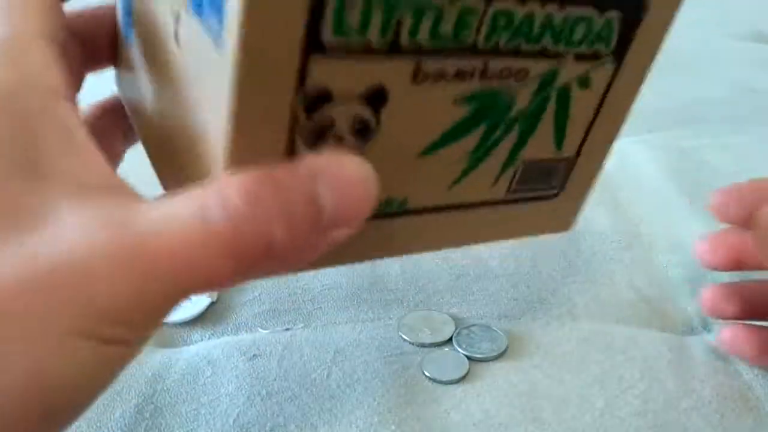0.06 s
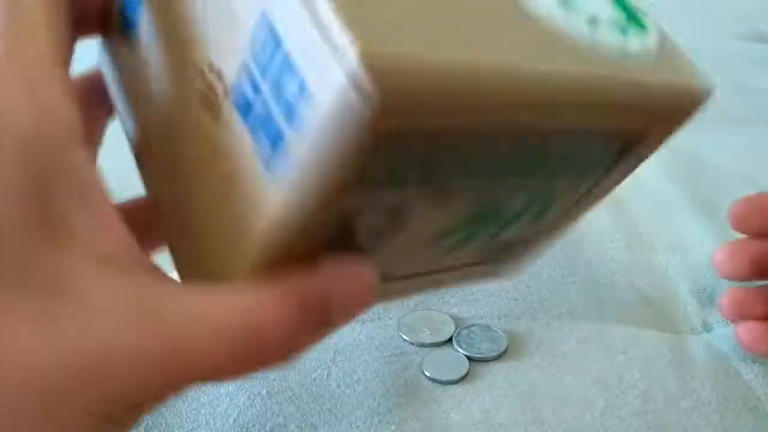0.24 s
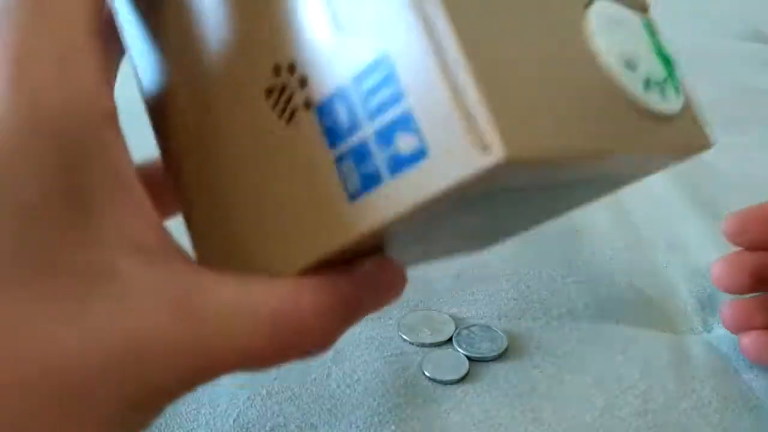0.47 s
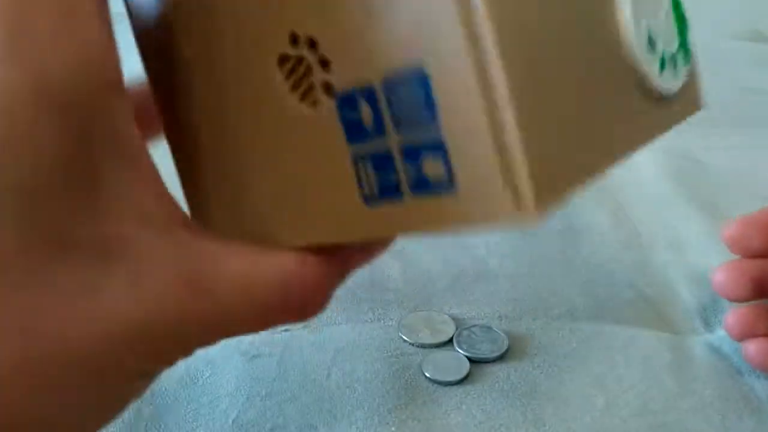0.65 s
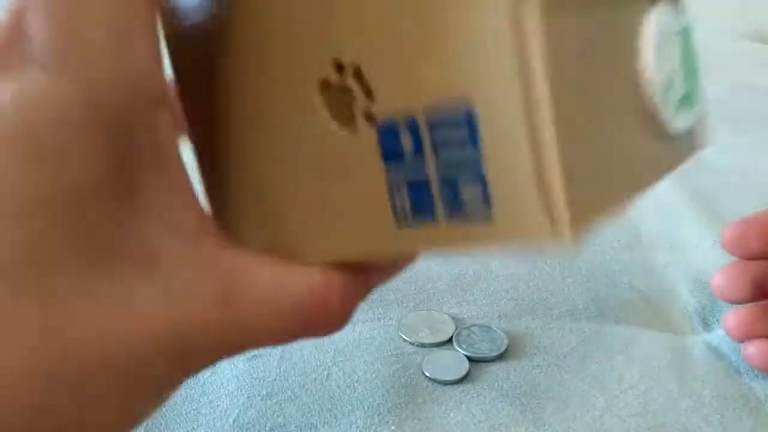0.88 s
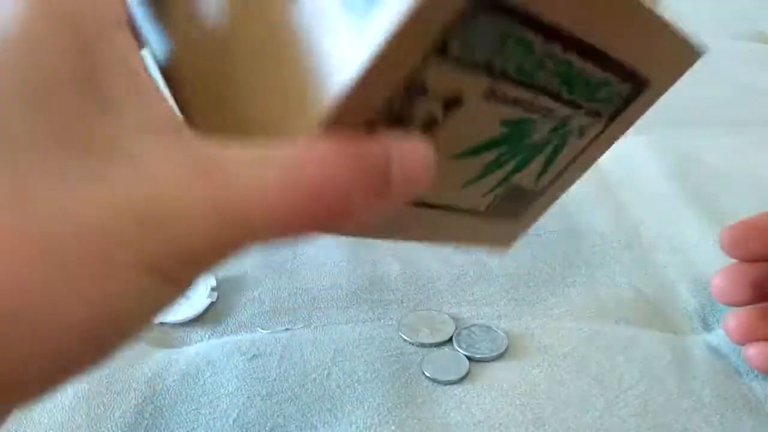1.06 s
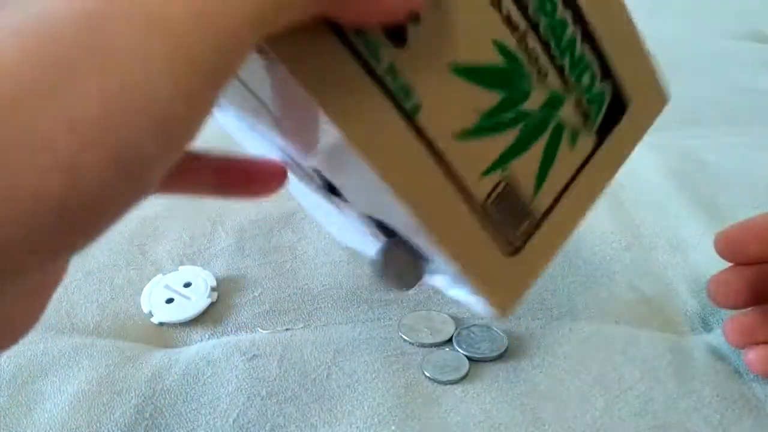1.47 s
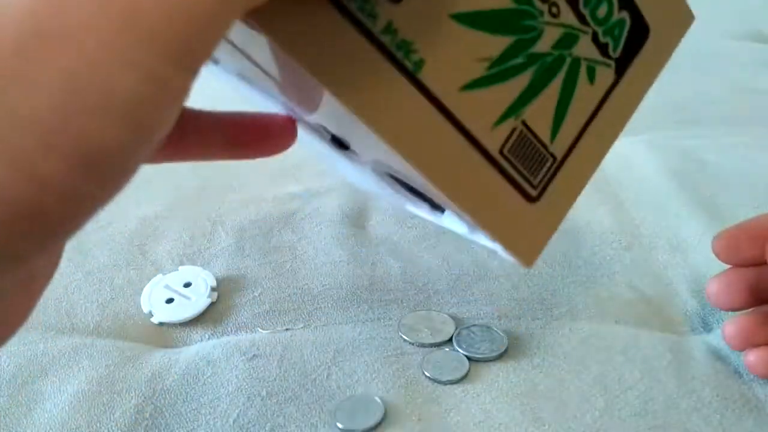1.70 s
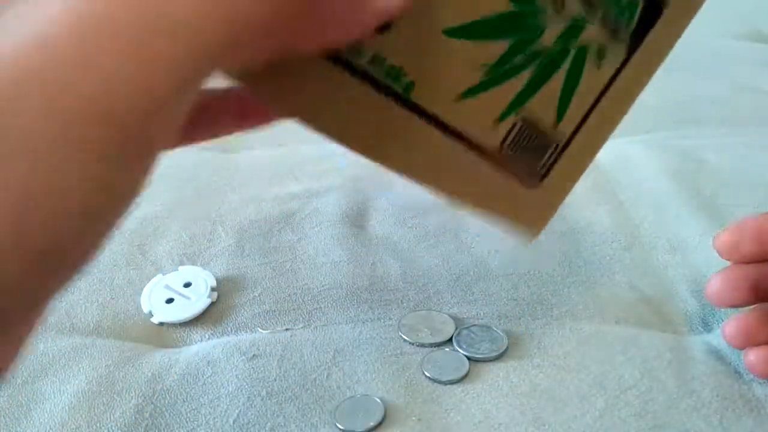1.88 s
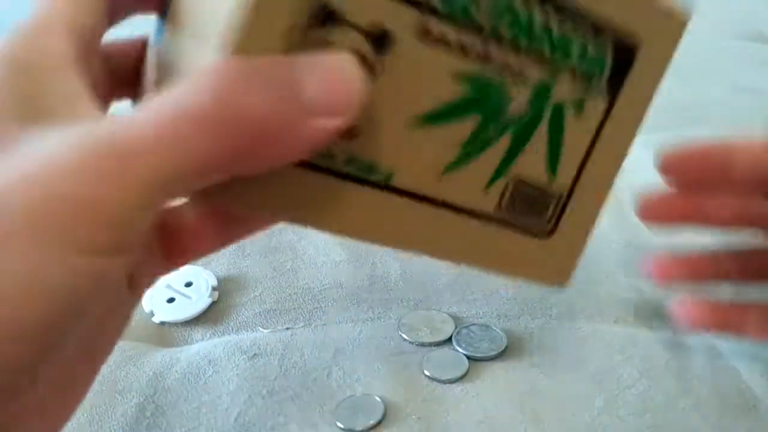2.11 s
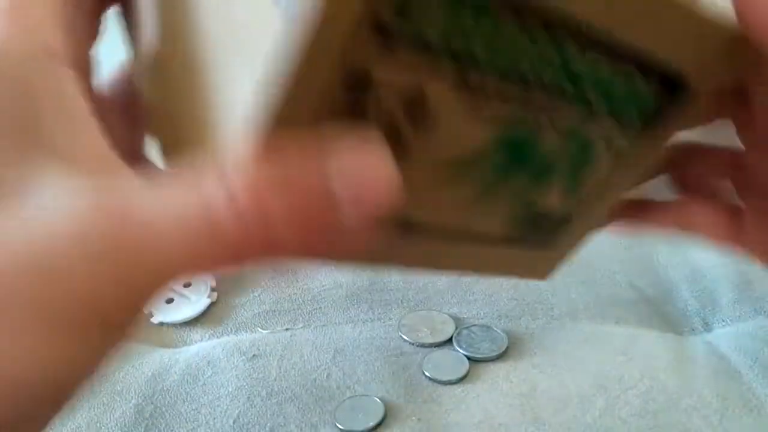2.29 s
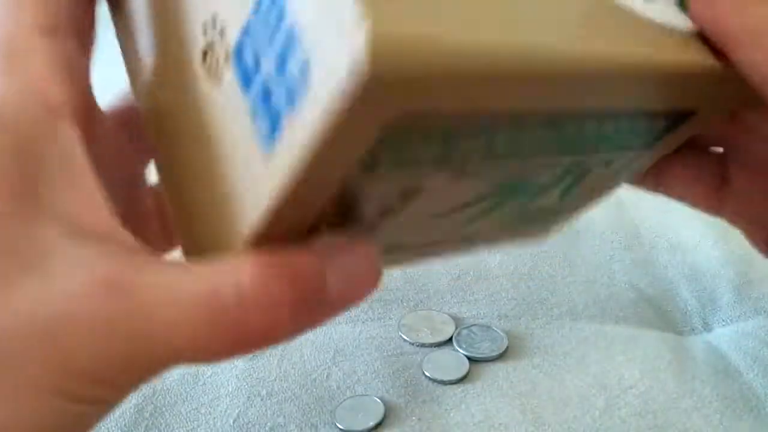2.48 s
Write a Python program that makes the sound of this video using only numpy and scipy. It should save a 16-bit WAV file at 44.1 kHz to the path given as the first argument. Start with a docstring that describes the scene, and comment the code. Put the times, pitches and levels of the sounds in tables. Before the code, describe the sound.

Coins rattle, slide and clink inside a small cardboard box shaken in uneven bursts. One clicks through the slot and thuds softly onto a cushion, then the shaking resumes harder. Close microphone in a small room.

```python
"""Coins in a small cardboard money box, shaken close to the microphone in a small room.
They slide over its floor, knock on its walls, clink on each other and ring while they fly free;
the cardboard panels colour the contacts, and the hollow box booms under the heavy landings.
One coin snaps against the slot and drops on a cushion. The hand rumbles and rubs faintly on the box.
Everything sits in the centre, with a short room tail and a little stereo spread in the treble."""
import sys
import numpy as np
from scipy import signal
from scipy.fft import rfft, irfft, next_fast_len
from scipy.io import wavfile
from scipy.ndimage import uniform_filter1d

SR = 44100
rng = np.random.default_rng(int(sys.argv[2]) if len(sys.argv) > 2 else 0)


def pcm_store(signal):
    """Save signal as 16-bit PCM."""
    levels = np.round(np.clip(np.atleast_2d(signal), -1, 1) * 32767)
    wavfile.write(sys.argv[1], SR, levels.astype(np.int16).T)


N = 116865
T = np.arange(SR // 4) / SR  # time axis of one event, in seconds
ATTACK = 1 - np.exp(-T / .0007)  # the fast onset of a hard contact


def amp(db):
    """Decibels to gain."""
    return 10 ** (np.asarray(db) / 20)


def unit(x):
    """Scale to rms 1."""
    return x / np.sqrt(np.mean(x ** 2) + 1e-20)


def unit_onset(x):
    """Scale to rms 1 over the first 8 ms."""
    return x / np.sqrt(np.mean(x[:SR // 125] ** 2) + 1e-20)


def along(points, hz):
    """Interpolate (freq_hz, value) points on a log frequency axis."""
    freqs, values = np.transpose(points)
    return np.interp(np.log(hz + 1), np.log(freqs + 1), values)


def colour(x, gain):
    """Minimum-phase filter with the given gain over frequency."""
    size = 2 * next_fast_len(len(x) // 2 + 600, real=True)
    cepstrum = irfft(np.log(np.maximum(gain(np.fft.rfftfreq(size, 1 / SR)), 1e-6)))
    cepstrum[1:size // 2] *= 2
    cepstrum[size // 2 + 1:] = 0
    return irfft(rfft(x, size) * np.exp(rfft(cepstrum)))[:len(x)]


def shaped(x, spectrum):
    """Colour by (freq_hz, gain_db) points, at rms 1."""
    return unit(colour(x, lambda hz: amp(along(spectrum, hz))))


def fade(t, t60):
    """Hold at 1 until t = 0, then fall 60 dB every t60 seconds."""
    return amp(-60 * np.maximum(t, 0) / t60)


def gate(length_s, rise_s, release_t60):
    """An envelope that rises, holds until length_s and dies away."""
    return (1 - np.exp(-T / rise_s)) * fade(T - length_s, release_t60)


def add(bus, start_s, x):
    """Mix x into the bus at start_s."""
    part = bus[max(round(start_s * SR), 0):][:len(x)]
    part += x[:len(part)]


def burst(spectrum, t60):
    """A short coloured noise burst."""
    return unit_onset(shaped(rng.standard_normal(len(T)) * fade(T, t60) * ATTACK, spectrum))


def mode(hz, t60):
    """One decaying resonance."""
    return np.sin(2 * np.pi * hz * T) * fade(T, t60)


def scatter(spectrum, t60, count):
    """A few modes at chance pitches within a spectrum."""
    edges = np.linspace(spectrum[1][0], spectrum[-2][0], count + 1)
    pitches = edges[:-1] + np.diff(edges) * rng.random(count)
    modes = sum(rng.choice([-1, 1]) * amp(along(spectrum, hz)) * mode(hz, t60) for hz in pitches)
    return unit_onset(modes * ATTACK)


def flutter(samples):
    """A quick random wavering of rms 1, smoothed over that many samples."""
    return unit(uniform_filter1d(uniform_filter1d(rng.standard_normal(len(T)), samples), samples))


# The quiet background at the microphone: freq_hz, gain_db
BACKGROUND_SPECTRUM = [(30, 5.5), (100, -2.5), (600, -15.5), (3000, -26), (14000, -31)]

def background(level_db=-79):
    """A faint, steady noise, strongest in the bass."""
    return amp(level_db) * shaped(rng.standard_normal(N), BACKGROUND_SPECTRUM)


# Resonances of the cardboard panels: pitch_hz, width_hz, relative_db
PANEL_MODES = [(588, 75, 2), (776, 41, 0.5), (1190, 710, 4), (1894, 92, 4), (2355, 61, 1.5),
               (2830, 31, 2.5), (4560, 330, 5.5)]

def box(x, trim_db=-1, low_cut_hz=340):
    """The panels resonate; the small box radiates little bass."""
    def gain(freq):
        peaks = sum(amp(db + trim_db) ** 2 / (1 + (2 * (freq - hz) / width_hz) ** 2)
                    for hz, width_hz, db in PANEL_MODES)
        return np.sqrt(1 + peaks) / np.sqrt(1 + (low_cut_hz / (freq + 1)) ** 6)
    return colour(x, gain)


# A contact heard close up, as wall thump, crack and metal chink: freq_hz, gain_db
THUMP_SPECTRUM = [(120, -18.5), (260, -6), (390, -8), (520, 1), (820, 0.5), (1000, -4), (1300, -2.5),
                  (1700, -3.5), (2600, -21)]
CRACK_SPECTRUM = [(900, -28.5), (1600, -4.5), (2400, 2), (3400, 0), (4600, -4.5), (6000, -4.5),
                  (8500, -4.5), (11300, -6), (12500, -13)]
CHINK_SPECTRUM = [(9000, -25), (11400, -11), (12300, -5.5), (12700, 2.5), (13300, -1), (14150, -4.5),
                  (14400, -13)]
# Coins skid over the floor of the box; levels are relative: start_s, length_s, cardboard_db, metal_db
COIN_SLIDES = [(0.052, 0.0092, -47.5, -51), (0.069, 0.043, -58.5, -65), (0.132, 0.02, -42, -53.5),
               (0.179, 0.14, -46.5, -50), (.274, 0.016, -38, -30.5), (0.296, 0.048, -49.5, -46),
               (.35, 0.075, -54, -59.5), (.448, 0.03, -42.5, -40), (0.484, 0.092, -57, -53),
               (0.667, 0.044, -67.5, -60), (0.908, 0.038, -50, -72.5), (1.321, 0.052, -65, -67.5),
               (1.391, 0.055, -52.5, -53.5), (1.487, 0.038, -49, -57.5), (1.746, 0.027, -78, -72.5),
               (1.927, 0.037, -44, -51.5), (1.975, 0.0916, -37.5, -35), (2.072, 0.0978, -53, -58.5),
               (2.163, 0.051, -47.5, -42.5), (2.327, 0.01, -49, -64.5), (2.341, 0.0604, -47, -60.5),
               (2.565, 0.035, -64, -60), (2.601, .05, -71, -73)]

def slides(taps_per_s=2200, spread_db=4, grain_t60=.0044):
    """Dense tiny contacts chatter while coins skid over the cardboard."""
    out = np.zeros(N)
    for start_s, length_s, cardboard_db, metal_db in COIN_SLIDES:
        taps = (rng.random(len(T)) < taps_per_s / SR) * amp(rng.normal(0, spread_db, len(T)))
        power = signal.fftconvolve(taps ** 2, fade(T, grain_t60) ** 2)[:len(T)]
        grains = np.sqrt(np.abs(power)) * gate(length_s, rise_s=.003, release_t60=.04)
        length_gain = np.sqrt(length_s / T[-1])  # a longer slide carries more energy
        for spectrum, db in [(THUMP_SPECTRUM, cardboard_db - 7), (CRACK_SPECTRUM, cardboard_db - 5.5),
                             (CHINK_SPECTRUM, metal_db)]:
            chatter = shaped(grains * rng.standard_normal(len(T)), spectrum)
            add(out, start_s, amp(db) * length_gain * chatter)
    return box(out)


# Coins hit the walls, close to the microphone; levels are relative:
# start_s, thump_db, crack_db, chink_db, pitch_hz
COIN_KNOCKS = [(0.1291, -52, -54, -46, 720), (0.1413, -46, -43, -39, 640), (0.1889, -46.5, -70, -39, 640),
               (0.2214, -42.5, -59, -56, 517), (0.2455, -39.5, -38, -33.5, 2420),
               (0.331, -50.5, -46, -43.5, 810), (0.4151, -64, -53, -46, 1100), (0.4464, -49, -44, -38, 880),
               (0.5269, -42, -42, -33.5, 2340), (0.5595, -58, -50, -44, 1870),
               (0.5922, -37, -30.5, -37.5, 857), (0.6191, -39, -33.5, -26.5, 1290),
               (0.6477, -30, -23, -19, 1230), (0.671, -50, -42, -44.5, 1190), (0.7147, -39, -39, -45, 793),
               (0.7236, -39.5, -34.5, -36.5, 1220), (0.736, -34, -37.5, -42.5, 1110),
               (0.7592, -38, -39, -55.5, 1100), (0.8547, -36.5, -34, -32, 543),
               (0.867, -41, -41.5, -41, 1306), (0.8921, -39, -39.5, -44.5, 722),
               (0.9071, -42, -42, -57, 559), (1.0606, -45.5, -43.5, -53, 1475),
               (1.0899, -45.5, -45.5, -50, 4200), (1.1045, -52, -58, -67, 1566),
               (1.262, -57, -59, -61.5, 534), (1.3893, -35.5, -42.5, -50, 775),
               (1.414, -46.5, -43, -42.5, 680), (1.4469, -44.5, -56, -59.5, 708),
               (1.4621, -45.5, -40.5, -38.5, 910), (1.4747, -33.5, -31.5, -32.5, 2747),
               (1.4859, -63, -40.5, -47, 1160), (1.5134, -45, -50, -47, 778),
               (1.9188, -37.5, -49.5, -40.5, 559), (1.9225, -44, -42, -38.5, 782),
               (1.9645, -30, -28, -26, 2380), (1.9856, -38.5, -36.5, -27.5, 960),
               (1.9916, -40.5, -36, -31, 486), (2.0253, -39, -35, -36.5, 776),
               (2.0338, -32.5, -38, -38.5, 664), (2.0433, -46, -36.5, -30.5, 685),
               (2.0536, -36.5, -49.5, -27, 640), (2.1576, -42, -35.5, -32.5, 840),
               (2.184, -41, -46, -49, 790), (2.1966, -47, -46, -39.5, 632), (2.336, -37.5, -40, -35, 814),
               (2.344, -35.5, -36.5, -51, 847), (2.37, -34.5, -33.5, -39, 2384),
               (2.4002, -43, -51.5, -51.5, 782), (2.5787, -64.5, -60, -53.5, 2890)]

def knocks():
    """Each hit thumps the wall, cracks and chinks; the struck spot and the coins ring briefly."""
    out = np.zeros(N)
    for start_s, thump_db, crack_db, chink_db, pitch_hz in COIN_KNOCKS:
        spot = unit_onset(mode(pitch_hz, t60=.026) * ATTACK)
        thump = box(burst(THUMP_SPECTRUM, t60=.045) + amp(2.5) * spot)
        crack = burst(CRACK_SPECTRUM, t60=.021) + amp(-4) * scatter(CRACK_SPECTRUM, t60=.014, count=11)
        chink = burst(CHINK_SPECTRUM, t60=.018) + amp(-2) * scatter(CHINK_SPECTRUM, t60=.026, count=5)
        for layer, db in [(thump, thump_db + 1), (box(crack), crack_db), (chink, chink_db)]:
            add(out, start_s, amp(db) * unit_onset(layer))
    return out


# Coins in free flight inside the box: start_s, length_s, level_db, pitch_hz
COIN_RINGS = [(.272, .012, -24, 12540), (.282, .034, -26, 12612), (.458, .017, -26, 12620),
              (0.486, 0.044, -40, 12605), (0.564, 0.011, -37, 12610), (1.422, 0.0072, -33.5, 12600),
              (1.966, .018, -31, 12600), (1.998, .028, -25, 12612), (2.044, .012, -28, 12580),
              (2.043, .012, -29, 13190), (2.195, 0.0077, -31, 12720)]

def rings(ring_t60=.44, waver_rad=.3, flutter_db=2.5, neighbour_db=-8):
    """A tumbling coin sings its lowest mode and sets its neighbours jingling until cardboard damps them."""
    out = np.zeros(N)
    for start_s, length_s, level_db, pitch_hz in COIN_RINGS:
        tone = np.sin(2 * np.pi * pitch_hz * T + waver_rad * flutter(samples=90))
        tumbling = unit(tone * amp(flutter_db * flutter(samples=130)))
        neighbours = amp(neighbour_db) * scatter(CHINK_SPECTRUM, ring_t60, count=7)
        envelope = fade(T, ring_t60) * gate(length_s, rise_s=.0049, release_t60=.035)
        add(out, start_s, amp(level_db) * (tumbling + neighbours) * envelope)
    return out


# The hand shifts its grip on the box: centre_s, width_s, level_db
GRIP_SHIFTS = [(0.553, 0.024, -58.5), (0.831, 0.063, -54), (1.116, 0.1, -65), (1.536, 0.034, -51.5),
               (1.8, 0.2395, -68), (2.013, 0.035, -60.5), (2.201, 0.18, -63.5)]
# Handling rumble at close range: freq_hz, gain_db
RUMBLE_SPECTRUM = [(38, -16), (54, 8), (72, -8.5), (110, -20.5), (200, -33.5), (500, -65.5)]

def hand():
    """Low swells of noise as the grip shifts."""
    t = np.arange(N) / SR
    effort = sum(amp(db) * np.exp(-2 * ((t - centre_s) / width_s) ** 2)
                 for centre_s, width_s, db in GRIP_SHIFTS)
    return effort * shaped(rng.standard_normal(N), RUMBLE_SPECTRUM)


# A skidding coin or a fingertip squeaks on the cardboard: start_s, length_s, level_db, pitch_hz
PANEL_SQUEAKS = [(0.913, 0.028, -50.5, 600), (0.968, 0.02, -54.5, 628), (2.198, 0.029, -52.5, 637),
                 (2.629, 0.016, -43, 570)]

def squeaks(waver_rad=.55):
    """Stick and slip keep a cardboard panel humming roughly."""
    out = np.zeros(N)
    for start_s, length_s, level_db, pitch_hz in PANEL_SQUEAKS:
        tone = np.sin(2 * np.pi * pitch_hz * T + waver_rad * flutter(samples=110))
        add(out, start_s, amp(level_db) * tone * gate(length_s, rise_s=.0025, release_t60=.04))
    return out


# Fingers and coins rub on the cardboard: start_s, length_s, start_db, end_db
RUB_STROKES = [(0.969, 0.1, -53, -76), (1.068, 0.033, -54, -58.5), (1.338, 0.098, -65, -50.5),
               (1.74, 0.03, -48, -65.5), (2.491, 0.013, -59.5, -59.5)]
# The dull colour of that rubbing: freq_hz, gain_db
RUB_SPECTRUM = [(150, -13), (300, -16), (550, 2), (1100, 0), (1750, 0), (2700, -7), (4400, -31)]

def rubs():
    """Soft strokes of friction with hardly any treble."""
    out = np.zeros(N)
    for start_s, length_s, start_db, end_db in RUB_STROKES:
        level = amp(np.interp(T, [0, length_s], [start_db, end_db]))
        friction = shaped(rng.standard_normal(len(T)), RUB_SPECTRUM)
        add(out, start_s, level * friction * gate(length_s, rise_s=.0031, release_t60=.018))
    return out


# A bright snap at the slot of the box: freq_hz, gain_db
SLOT_SPECTRUM = [(600, -35), (3000, -9.5), (4700, -0.5), (10500, -3.5), (12500, -14)]

def slot(start_s=1.475, level_db=-27.5):
    """A coin's edge catches the lip of the slot on its way out."""
    out = np.zeros(N)
    add(out, start_s, amp(level_db) * burst(SLOT_SPECTRUM, t60=.014))
    return out


# The cushion below the box: pitch_hz, level_db, t60_s
CUSHION_MODES = [(83.6, -30.5, 0.084), (184, -48, 0.086), (270, -41.5, 0.067)]

def drop(start_s=1.606, rise_s=.018):
    """The escaped coin lands on the cushion with a soft, low thud."""
    out = np.zeros(N)
    thud = sum(amp(db) * mode(hz, t60) for hz, db, t60 in CUSHION_MODES)
    add(out, start_s, thud * np.minimum(T / rise_s, 1) ** 2)
    return out


# Heavy landings inside the box: start_s, level_db, pitch_hz
BOX_BOOMS = [(1.978, -35, 272), (2.031, -33, 280), (2.337, -36, 209), (2.367, -38, 295)]

def booms():
    """The whole pile of coins lands at once and the hollow box booms."""
    out = np.zeros(N)
    for start_s, level_db, pitch_hz in BOX_BOOMS:
        rise = 1 - np.exp(-T * pitch_hz)  # over about one cycle
        add(out, start_s, amp(level_db) * mode(pitch_hz, t60=.037) * rise)
    return out


# Decay of the small room: freq_hz, t60_s
ROOM_DECAY = [(200, 0.01), (700, 0.195), (2000, 0.215), (6000, 0.215), (13000, 0.26)]
# Its tail at the microphone, relative to the direct sound: freq_hz, gain_db
ROOM_SPECTRUM = [(700, -9.5), (2500, -10), (7000, -11), (13000, -14)]

def room(x, positions=8, onset_s=.004):
    """A short diffuse tail that changes as the box moves: each stretch of time gets its own."""
    out = np.zeros(N)
    for part in np.array_split(np.arange(N), positions):
        hz, t, noise = signal.stft(rng.standard_normal(SR // 2), SR, nperseg=256)
        decay = fade(t, along(ROOM_DECAY, hz)[:, None])
        _, tail = signal.istft(noise * decay, SR, nperseg=256)
        tail *= 1 - np.exp(-np.arange(len(tail)) / SR / onset_s)
        add(out, part[0] / SR, signal.fftconvolve(x[part], tail / np.linalg.norm(tail)))
    return colour(out, lambda hz: amp(along(ROOM_SPECTRUM, hz)))


def scene(low_cut_hz=170, wide_hz=3500, side_db=-19):
    """The box is close and straight ahead of the microphone; only the treble spreads a little."""
    coins = knocks() + booms() + slides() + rubs() + squeaks() + rings() + slot()
    low_cut = signal.butter(2, low_cut_hz, "high", fs=SR, output="sos")
    coins = signal.sosfilt(low_cut, coins)  # the coin sounds carry no deep bass
    mid = coins + room(coins) + drop() + hand() + background()
    hz = np.fft.rfftfreq(N, 1 / SR)
    treble = 1 / (1 + (wide_hz / (hz + 1)) ** 10)
    side = amp(side_db) * irfft(1j * rfft(mid) * treble, N)  # a quarter cycle from the mid
    return np.array([mid + side, mid - side])


def record(dry, edge_hz=14280, top_hz=15200):
    """The recorder falls steeply at its band edge, then fades to nothing just above top_hz."""
    hz = np.fft.rfftfreq(2 * N, 1 / SR)
    gain_db = np.interp(hz, [edge_hz - 60, edge_hz + 100, top_hz, top_hz + 600], [0, -20, -26, -100])
    return irfft(rfft(dry, 2 * N) * amp(gain_db))[:, :N]


dry = scene()
out = record(dry)
pcm_store(out)
```